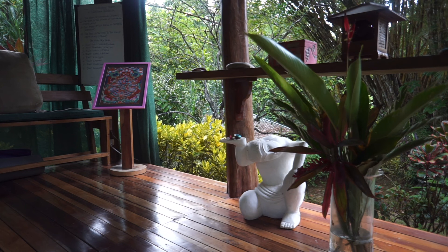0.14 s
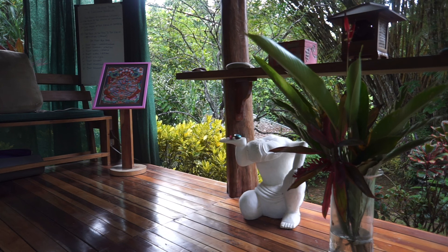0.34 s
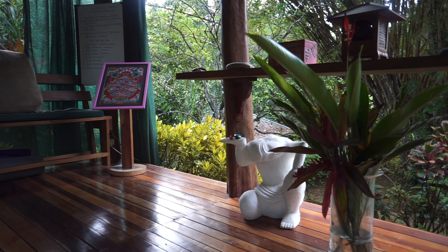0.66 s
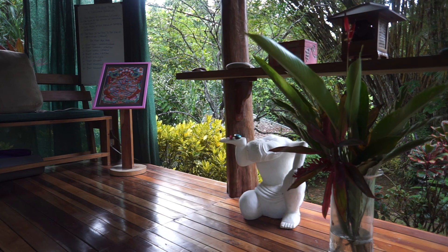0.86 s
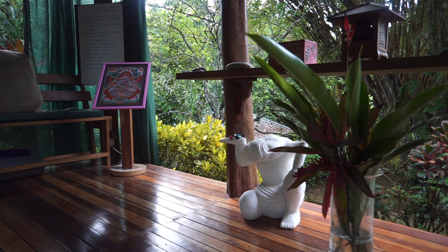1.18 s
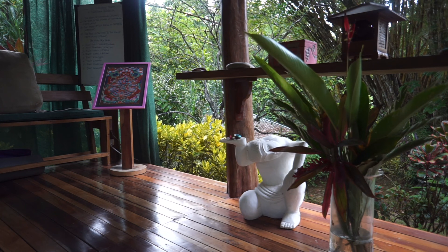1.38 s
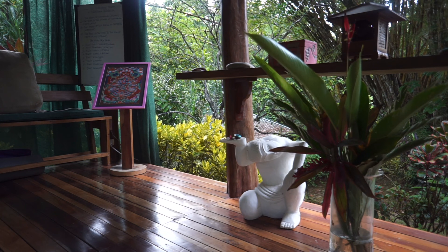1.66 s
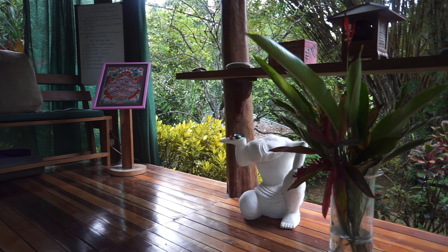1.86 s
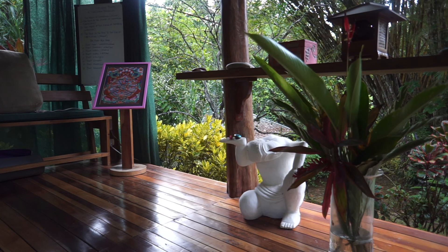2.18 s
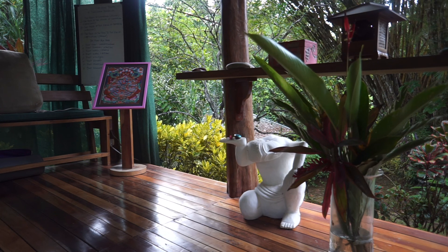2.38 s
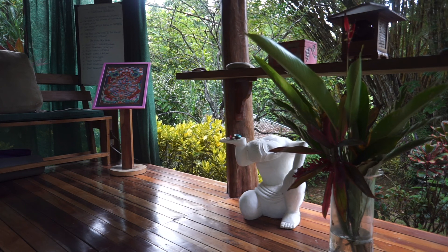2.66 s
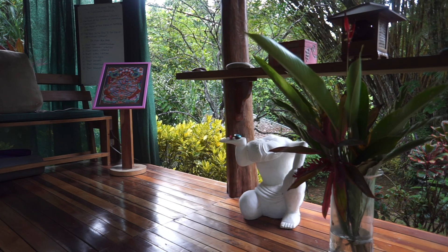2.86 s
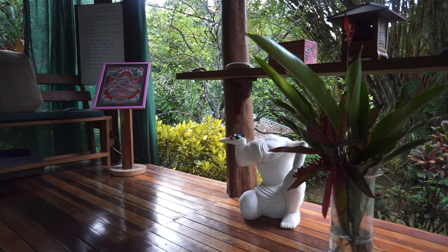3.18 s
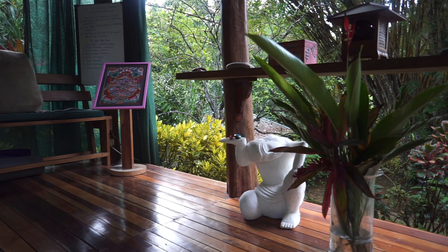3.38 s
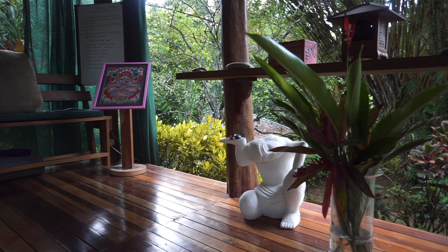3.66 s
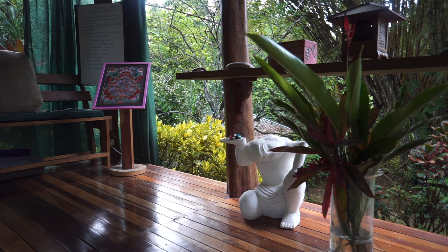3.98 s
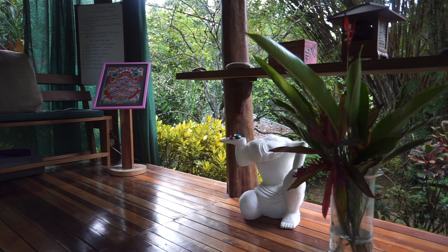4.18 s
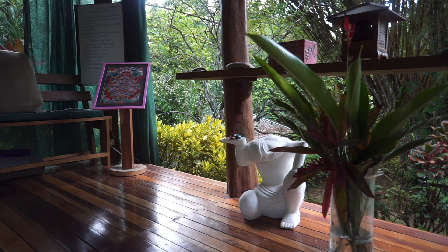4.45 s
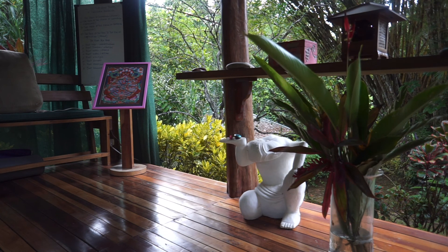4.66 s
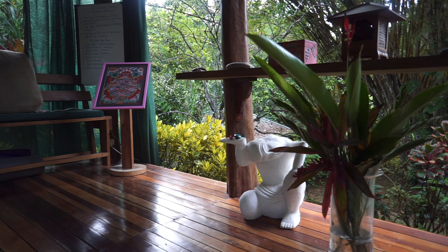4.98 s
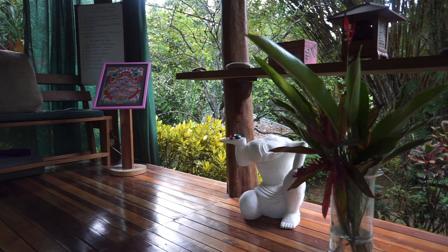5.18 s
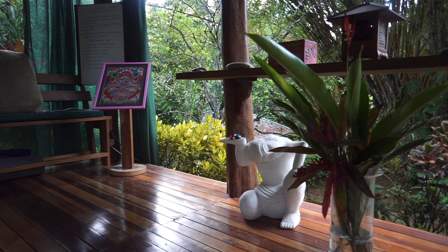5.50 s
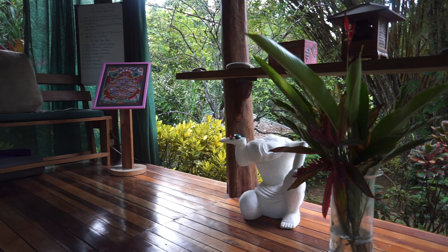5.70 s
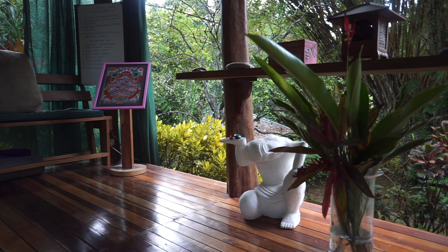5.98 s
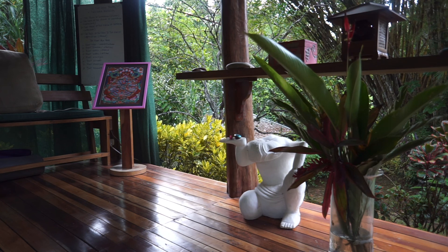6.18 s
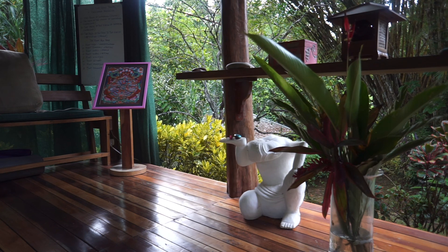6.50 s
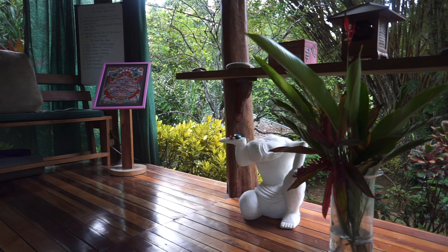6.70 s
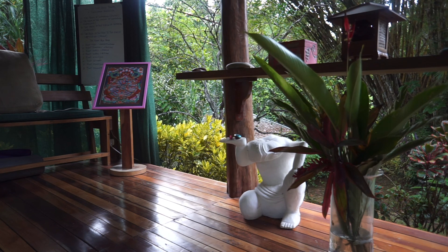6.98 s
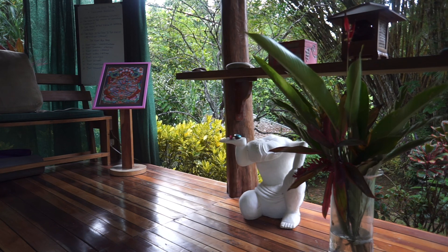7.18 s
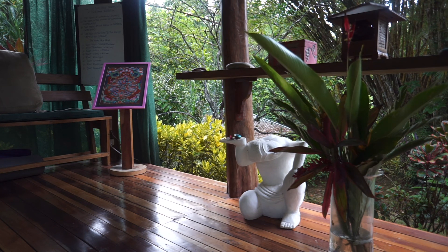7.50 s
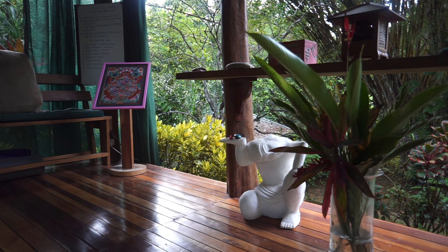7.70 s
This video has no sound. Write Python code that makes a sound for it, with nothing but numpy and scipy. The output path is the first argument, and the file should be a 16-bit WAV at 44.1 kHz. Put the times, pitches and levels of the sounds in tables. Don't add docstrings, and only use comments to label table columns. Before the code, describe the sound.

A quiet, wide stereo scene on a wooden veranda facing tropical forest. From 0 s a frog clicks about eight times a second until roughly 2.3 s, over soft leaf hiss, a far machine's low hum and four thin, throbbing insect tones between about 6 and 9 kHz, leaning left. Faint distant birds whistle; small twigs snap at 0.3, 0.6 and 0.9 s. Near 1.1 s a board gives a soft low thump. From 1.6 s a bird whistles pure notes gliding upward around 2 to 3 kHz, beaded with echoes among the trees. At 3.5 s the lingering echoes drop; a joint creaks around 3.8 s and leaves rasp at 4 s while rising pairs continue until 5.4 s. A long whistle leaps up at 5.7 s and sinks by 6.1 s amid rustling. Air puffs lightly on the microphone; sparse fainter calls return after 7 s, the last near 7.7 s.

```python
import sys
import numpy as np
from scipy import signal
from scipy.io import wavfile
from scipy.ndimage import uniform_filter1d

SR = 44100
rng = np.random.default_rng(int(sys.argv[2]) if len(sys.argv) > 2 else 0)


def pcm_store(signal):
    levels = np.round(np.clip(np.atleast_2d(signal), -1, 1) * 32767)
    wavfile.write(sys.argv[1], SR, levels.astype(np.int16).T)


def makeup_ratio(level_db):
    decades = np.asarray(level_db, float) / 20
    return 10 ** decades


N = 345734
LEFT_RIGHT = np.array([[.5], [-.5]])
FLASH_HZ = 2480


def rms_one(x):
    return x / np.sqrt(np.mean(x ** 2) + 1e-20)


def in_time(rows):
    s, *columns = np.transpose(rows)
    return [np.interp(np.arange(N) / SR, s, c) for c in columns]


def at_hz(points, hz):
    points = np.array(points)
    return np.interp(np.log(hz), np.log(points[:, 0] + 1), points[:, 1])


def drift(rate_hz):
    r = np.exp(-80 * np.pi * rate_hz / SR)
    slow = signal.lfilter([1], [1, -2 * r, r * r], rng.standard_normal(N // 40 + 2002))[2000:]
    return np.interp(np.arange(N) / 40, np.arange(len(slow)), rms_one(slow))


def noise_pair():
    return rng.standard_normal((2, N))


def band(x, low_hz, high_hz):
    sos = signal.butter(2, [low_hz, min(high_hz, .45 * SR)], "band", fs=SR, output="sos")
    return signal.sosfilt(sos, x)


def resonate(x, hz, width_hz):
    r = np.exp(-np.pi * width_hz / SR)
    return signal.lfilter([(1 - r * r) / 2, 0, (r * r - 1) / 2], [1, -2 * r * np.cos(2 * np.pi * hz / SR), r * r], x)


def strike(events, modes):
    clicks = np.zeros(N) + 1e-18
    clicks[[round(s * SR) for s, db in events]] = makeup_ratio(np.array(events)[:, 1])
    out = 0
    for k, (hz, db, t60) in enumerate(modes):
        r, w = makeup_ratio(-60 / (t60 * SR)), 2 * np.pi * hz / SR
        push = (-1) ** k * makeup_ratio(db) * np.sin(w)
        out = out + signal.lfilter([0, push], [1, -2 * r * np.cos(w), r * r], clicks)
    return out


def pair(mid, side, alike):
    alike = np.clip(alike, -1, 1)
    return (np.sqrt(1 + alike) * mid + np.sqrt(1 - alike) * side * [[1], [-1]]) / np.sqrt(2)


def whistle(note, waver, beads=0, throb=0):
    s, hz, db = np.transpose(note)
    s = s - 0.0037
    at = np.arange(round(s[0] * SR), min(round(s[-1] * SR), N))
    t = at / SR
    pitch = uniform_filter1d(np.interp(t, s, hz), size=500, mode="nearest") * (1 + waver[at])
    level = makeup_ratio(np.interp(t, s, db)) * np.clip(np.minimum((t - s[0]) / .022, (s[-1] - t) / .008), 0, 1)
    level = level * (1 + beads * np.cos(2 * np.pi * (pitch - FLASH_HZ) / 155))
    level = level * (1 + throb * np.cos(2 * np.pi * 42 * (t - 5.96)))
    out = np.zeros(N)
    out[at] = np.sqrt(2) * level * np.sin(2 * np.pi * np.cumsum(pitch) / SR)
    return out


# flash_s (when at the flash pitch), lead_in_s, climb_s, top_hz, knee_level_db
RISES = [(1.87, 0.019, 0.092, 2850, -61.5), (2.146, 0.079, 0.025, 2724, -47.5),
         (2.308, .085, 0.026, 2755, -45.5), (2.706, 0.1, .05, 3000, -46.5),
         (2.856, 0.065, 0.051, 2950, -46), (3.273, .065, 0.062, 3000, -46),
         (3.431, 0.038, 0.055, 3030, -45), (3.607, 0.084, .022, 2720, -45.5),
         (4.02, 0.082, 0.053, 2974, -45.5), (4.166, 0.041, .065, 2980, -44.5),
         (4.604, .065, 0.061, 2980, -44.5), (4.76, 0.029, .062, 3000, -43.5),
         (5.195, 0.076, 0.067, 2990, -44), (5.353, 0.018, 0.063, 3045, -43)]


def rising_notes(waver):
    out, knee_hz, top_hold_s = 0, 2400, .022
    for s, lead, climb, high, db in RISES:
        when = np.linspace(s - lead, s + climb + top_hold_s, num=40)
        hz = np.interp(when, [s - lead, s, s + .85 * climb, s + 1.18 * climb],
                       [FLASH_HZ - 5700 * lead, FLASH_HZ, high - .15 * (high - FLASH_HZ), high])
        khz = (hz - knee_hz) / 1000
        level = db + np.where(khz < 0, 29, 10.5) * khz
        level += 4 * np.exp(-((hz - FLASH_HZ) / 28) ** 2)
        level -= 14 * np.clip((when - s - 0.81 * climb) / top_hold_s, 0, 1)
        out = out + whistle(np.transpose([when, hz, level]), waver, beads=.65)
    return out


# start_s, length_s, from_hz, held_hz, peak_level_db
CLOSES = [
    (1.63, 0.079, 2103, 2468, -46.5),
    (2.95, 0.16, 1980, 2400, -45),
    (3.71, 0.069, 2030, 2250, -51),
    (4.29, 0.13, 2200, 2493, -42.5),
    (4.914, 0.054, 2390, 2290, -44.5),
    (5.5, 0.113, 2330, 2483, -43.5),
    (7.214, 0.11, 1955, 2385, -53.5),
    (7.73, 0.08, 2050, 2482, -45.5),
]


def closing_notes(waver):
    out = 0
    for s, length, low, held, db in CLOSES:
        note = [(s, low, db - 6), (s + .45 * length, held, db), (s + length, held, db - 7)]
        out = out + whistle(note, waver)
    return out


# start_s, pitch_hz, level_db
LONG_NOTE = [
    (5.71, 2313, -43),
    (5.79, 2669, -40),
    (5.88, 2658, -43),
    (6.0, 2594, -44.5),
    (6.07, 2538, -44),
]


def bird(waver):
    return rising_notes(waver) + closing_notes(waver) + whistle(LONG_NOTE, waver, throb=.3)


# start_s, length_s, from_hz, to_hz, level_db
FALLS = [(.25, .06, 2900, 3020, -54), (.15, .08, 2540, 2680, -54), (.34, .04, 3320, 3300, -56),
         (.94, .07, 2430, 2760, -52), (1.075, .03, 2450, 2480, -52), (1.55, .025, 2430, 2500, -52),
         (1.795, .05, 2110, 2090, -51), (7.4, .03, 2420, 2230, -49), (6.14, .09, 3860, 3800, -52),
         (6.104, .03, 3040, 3090, -37), (.57, .06, 3650, 3480, -51), (1.13, .05, 3800, 3800, -58),
         (1.27, .05, 3800, 3750, -57), (1.225, .07, 2320, 2297, -51), (1.322, .057, 2320, 2320, -46),
         (1.385, .097, 2830, 2730, -52), (6.085, .055, 2490, 2470, -36), (7.02, .035, 3840, 3835, -52),
         (7.33, .07, 2240, 2330, -49), (.01, .072, 2137, 2166, -51), (.69, .06, 2190, 2150, -57)]
# start_s, pitch_hz, level_db
WARBLE = [
    (7.54, 1790, -57),
    (7.585, 2110, -67),
    (7.64, 2100, -62),
    (7.67, 2020, -58),
    (7.7, 1930, -63),
    (7.75, 1890, -62),
]


def farther_birds(waver):
    out = whistle(WARBLE, waver)
    for s, length, start_hz, end_hz, db in FALLS:
        out += whistle([(s, start_hz, db), (s + length, end_hz, db - 14.5)], waver)
    return out


# start_s, peak_db
FROG = [(0.0094, -53), (0.1206, -51), (0.2394, -52), (0.3541, -50), (0.4753, -48), (0.5901, -48.5),
        (0.7058, -48.5), (0.823, -49), (0.9494, -55), (1.072, -53), (1.1942, -47), (1.3179, -52),
        (1.4311, -64), (1.5514, -52), (1.6906, -51), (1.7933, -49), (1.9116, -48), (2.0457, -57),
        (2.164, -52), (2.2777, -52)]
# pitch_hz, level_db, t60_s
FROG_MODES = [(1129, 3.5, 0.042), (1330, 4, 0.018), (2070, -1.5, 0.073), (2165, -1.5, 0.19)]


def frog():
    return strike(FROG, FROG_MODES)


# pitch_hz, width_hz
VERANDA_HZ = [(2010, 40), (2130, 30), (2250, 34), (2345, 28), (2410, 20), (2478, 20), (2548, 20),
              (2650, 32), (2745, 28), (2810, 22), (2855, 18), (2930, 36), (3030, 36)]
# left_db, right_db
VERANDA = [(3, 7), (4, 10.5), (-18, 5), (-1.5, -5.5), (5, 5.5), (9, 7), (3.5, 9), (4.5, 6), (3, -33),
           (4, -14), (-11, 9), (-9, -1), (0, 11)]


def forest(x, wet_db):
    t = np.arange(3 * SR // 2) / SR
    decay = makeup_ratio(-60 * t / 1.1) + makeup_ratio(-1 - 60 * t / .62)
    scatter = pair(*rng.standard_normal((2, len(t))), .6) * decay * np.minimum(t / .006, 1)
    response = makeup_ratio(wet_db) * scatter / np.sqrt(np.sum(scatter ** 2) / 2)
    click = (t == 0) + 1e-18
    response += makeup_ratio(-3.5) * click
    for k, ((hz, width), sides_db) in enumerate(zip(VERANDA_HZ, VERANDA)):
        response += (-1) ** k * makeup_ratio(np.array(sides_db)[:, None]) * resonate(click, hz, width)
    before = np.arange(N) < 3.523 * SR
    early = signal.fftconvolve([x * before], response, axes=1)[:, :N]
    late = signal.fftconvolve([x * ~before], response, axes=1)[:, :N]
    return early * np.where(before, 1, makeup_ratio(-6.5)) + late


# start_s, level_db
INSECT_HIGH = [(0.0, -61), (0.94, -59.5), (1.55, -67.5), (1.79, -60.5), (2.4, -65.5), (2.9, -59.5),
               (3.49, -69), (3.54, -62.5), (5.02, -57), (5.42, -63), (6.09, -54.5), (6.57, -60),
               (7.77, -58), (7.84, -60.5)]
# start_s, end_s, level_db
BOUTS = [
    (0.547, 1.94, -62.5),
    (2.72, 5.018, -61.5),
    (5.5, 6.8, -60.5),
    (7.13, 8.14, -60),
]
# start_s, level_db
INSECT_BROAD = [
    (0, -60.5),
    (.5, -65.5),
    (2.1, -62.5),
    (3, -61.5),
    (7.84, -61),
]
# middle_s, level_db
INSECT_CHIRP = [(.27, -60), (.97, -62), (1.4, -62), (1.85, -59), (2.3, -61), (2.83, -61), (3.37, -70),
                (3.72, -67), (4.22, -60), (4.7, -61), (5.17, -63), (5.7, -58), (6.1, -61), (6.55, -64),
                (6.97, -61), (7.45, -59)]
# pitch_hz, width_hz
INSECT_HZ = [
    (8598, 75),
    (6853, 45),
    (6575, 120),
    (6095, 90),
]
# throbs_per_s, throb_depth (0-1), left_right_db, left_right_likeness (0-1), trim_db
VOICES = [
    (65, .4, 1.5, .5, 1.5),
    (37, .4, 5, .5, 2),
    (37, .3, 2.5, .3, 1.5),
    (40, .3, 7, .4, 5),
]


def insects():
    chirps = []
    for s, db in INSECT_CHIRP:
        chirps += [(s + side * .12, db - 14 * abs(side) ** 3) for side in (-1.24, -0.86, 0.9, 1)]
    bouts, edge_s, rest_db = [], .09, -67.5
    for a, b, db in BOUTS:
        bouts += [(a - edge_s, rest_db), (a + edge_s, db), (b - edge_s, db), (b + edge_s, rest_db)]
    levels = [in_time(rows)[0] for rows in (INSECT_HIGH, bouts, INSECT_BROAD, chirps)]
    levels[0] = levels[0] + 0.43 * drift(9.0)
    out = 0
    for level_db, (hz, width), (rate, depth, pan_db, alike, trim_db) in zip(levels, INSECT_HZ, VOICES):
        song = resonate(resonate(noise_pair(), hz, width), hz, 4 * width)
        throb = 1 + depth * np.sin(2 * np.pi * np.cumsum(rate * (1 + 0.0455 * drift(2.82))) / SR)
        song = rms_one(pair(*song, alike) * throb * makeup_ratio(drift(12)))
        out = out + song * makeup_ratio(level_db + trim_db) * makeup_ratio(pan_db * LEFT_RIGHT)
    return out


# start_s, level_db
THUMP = [
    (1.056, -35.5),
    (1.074, -40.5),
    (1.098, -34.5),
]
# pitch_hz, level_db, t60_s
BOARD = [(175.9, 10.5, 0.59), (205, 4.5, 0.5), (227, -4, 0.43), (249, 6, 0.22), (264.6, 1.5, 0.35),
         (296.6, -2, 0.49), (350, -9, 1), (386, -18.5, 0.62), (450, -17, 0.32), (534, -17, .3),
         (610, -31, .2), (663, -11.5, 0.057), (750, -21, 0.091)]


def thump():
    return band(band(strike(THUMP, BOARD), 183, 1200), 110, 3000)


# start_s, slips_per_s, level_db
CREAK = [
    (3.795, 220, -51),
    (3.82, 190, -46),
    (3.84, 230, -53),
    (3.858, 246, -44),
    (3.872, 240, -51),
    (3.89, 207, -42),
    (3.925, 240, -57),
]
# pitch_hz, width_hz, level_db
CREAK_MODES = [(229, 49, 6), (426, 73, 2), (593, 123, 5)]


def creak():
    rate, level_db = in_time(CREAK)
    turns = np.cumsum(rate * (1 + .16 * drift(90))) / SR
    slips = np.diff(np.floor(turns), prepend=0) * makeup_ratio(1.5 * drift(40))
    wood = sum(makeup_ratio(db) * resonate(resonate(slips, hz, width), hz, 2 * width) for hz, width, db in CREAK_MODES)
    t = np.arange(N) / SR
    return rms_one(wood) * makeup_ratio(level_db) * (t > CREAK[0][0]) * (t < CREAK[-1][0])


# start_s, level_db, low_hz, high_hz
SNAPS = [
    (0.294, -49.5, 3500, 10500),
    (.565, -44.5, 1710, 4450),
    (0.916, -47, 2000, 2920),
    (1.057, -47.5, 500, 1400),
    (2.914, -52, 7100, 10700),
    (3.555, -55, 4000, 10500),
    (4.655, -46, 350, 990),
    (4.71, -52, 7000, 11300),
    (5.249, -47, 566, 1460),
]
# start_s, level_db,
# low_hz, high_hz
BRUSHES = [(.585, -56, 3080, 3750), (0.936, -60, 2300, 2920), (1.065, -44.5, 290, 623),
           (1.292, -52.5, 2500, 5500), (2.62, -54.5, 2940, 3700), (2.869, -48.5, 1140, 2070),
           (4.004, -51.5, 910, 1120), (4.008, -51, 1500, 2050), (4.141, -48.5, 1520, 2130),
           (4.429, -54, 1260, 1710), (4.428, -53.5, 3040, 4630), (5.62, -49.5, 830, 1970),
           (6.1, -40.5, 2640, 3100), (6.105, -48, 3020, 3950), (6.17, -49, 2260, 3060),
           (6.225, -50.5, 862, 1590), (7.119, -51.5, 2180, 3200), (7.13, -51, 890, 10500),
           (7.41, -51.5, 1190, 4470)]
# start_s, level_db
RASPS = [
    (4.016, -46.5),
    (6.051, -47),
]
# low_hz, high_hz, level_db
RASP_BANDS = [(1460, 2320, -3.5), (2980, 3120, -2.5), (3200, 3840, 1.5), (3660, 3900, -3),
              (3650, 5640, -1.5)]


def rustles():
    # start, level, band edges, rise s, t60 s, depth of pulsing
    bursts = [(*row, .0013, .27, 0) for row in SNAPS]
    bursts += [(*row, .0088, .53, 0) for row in BRUSHES]
    bursts += [(s, db + 4.5, low, high, .0013, .018, 0) for s, db, low, high in SNAPS]
    for s, db in RASPS:
        bursts += [(s, db + band_db, low, high, .045, .63, .8) for low, high, band_db in RASP_BANDS]
    out, t = np.zeros((2, N)), np.arange(SR // 2) / SR
    for s, db, low, high, rise, t60, pulsing in bursts:
        noise = rng.standard_normal((2, len(t)))
        lumps_db = 0.94 * rng.standard_normal(len(t) // 50 + 1).repeat(50)[:len(t)]
        pulses = 1 + pulsing * np.sin(2 * np.pi * 230 * t + 3 * np.sin(70 * t))
        grains = noise * makeup_ratio(lumps_db) * pulses
        shape = np.minimum(t / rise, 1) * makeup_ratio(-60 * np.maximum(t - rise, 0) / t60)
        burst = makeup_ratio(db) * rms_one(band(band(pair(*grains, 0.26), low, high), low, high)) * shape
        at = round(s * SR)
        out[:, at:at + len(t)] += burst[:, :N - at]
    return out


# start_s, peak_db
PUFFS = [(1.14, -50), (1.42, -65), (3.6, -68), (5.15, -66), (5.83, -63), (6.131, -55), (6.33, -55),
         (6.62, -60), (7.23, -58), (7.53, -51.5), (7.82, -57)]


def air():
    t = np.arange(N) / SR
    level = makeup_ratio(-69) + sum(makeup_ratio(db - 139 * abs(t - s)) for s, db in PUFFS)
    return level * makeup_ratio(0.61 * drift(5.0)) * rms_one(band(pair(*noise_pair(), 0.87), 40, 111))


# start_s, level_db
BREEZE = [(0, -55), (1.3, -56), (1.9, -54), (2.45, -56.5), (3.3, -52), (4.8, -53), (5.5, -53),
          (6.15, -48.5), (6.6, -55), (7.0, -55), (7.25, -51.5), (7.84, -54.5)]


def breeze():
    level = makeup_ratio(in_time(BREEZE)[0] + 1.5 * drift(0.41))
    return level * rms_one(band(pair(*noise_pair(), 0.015), 590, 3530))


# start_s, level_db
CHORUS = [(0, -54.5), (.4, -57), (.8, -53), (1.2, -55.5), (1.6, -57), (2.0, -56), (2.6, -60), (3.2, -59),
          (6.3, -54), (6.6, -82), (7.1, -77), (7.84, -62)]


def chorus():
    bands = (makeup_ratio(5.1 * drift(6.2)) * resonate(noise_pair(), hz, 200) for hz in np.geomspace(2050, 3300, 5))
    return makeup_ratio(in_time(CHORUS)[0]) * rms_one(pair(*sum(bands), 1.0))


# pitch_hz, level_db, width_hz
HUM = [(117.4, -62.5, 23), (359, -63, 1.44)]


def hum():
    return sum(makeup_ratio(db) * rms_one(resonate(rng.standard_normal(N), hz, width)) for hz, db, width in HUM)


# pitch_hz, level_db (per Hz)
BED = [(30, -35), (60, -15.5), (118, -2.5), (288, 0), (450, -2), (800, -10), (2230, -13), (3600, -25),
       (5400, -10.5), (6500, -16), (7600, -19), (9500, -18), (10500, -22.5)]
# pitch_hz, left_right_likeness
LIKENESS = [(60, 0.87), (130, 0.82), (260, 0.34), (550, 0.014), (1150, 0.015), (2410, 0.13), (5050, 0.26),
            (10600, 0.15)]
# pitch_hz, left_right_db
SIDES_DB = [(60, -8), (170, 1), (470, 0), (1340, -0.5), (3760, 2.5), (10600, 1)]


def bed(patchy_db):
    out, edges = 0, 30 * 2 ** np.arange(0, 9.1, .5)
    white = rng.standard_normal((2, 2, N))
    for k, (low, high) in enumerate(zip(edges, edges[1:])):
        hz = np.sqrt(low * high)
        gain = makeup_ratio(at_hz(BED, hz) + patchy_db * drift(19.0) + at_hz(SIDES_DB, hz) * LEFT_RIGHT)
        out = out + gain * pair(*band(white[k % 2], low, high), at_hz(LIKENESS, hz))
    return rms_one(out)


def scene():
    waver, ticks = drift(37.6), frog()
    birds = bird(.0015 * waver) + farther_birds(.011 * waver)
    far = forest(birds + makeup_ratio(-9.0) * ticks, wet_db=5) * makeup_ratio(.9 * drift(11))
    near = makeup_ratio(-3.5) * ticks + thump() + creak()
    weather = breeze() + hum() + air()
    hiss = makeup_ratio(-50.5 + 0.47 * drift(5.0)) * bed(patchy_db=1.0)
    return far + near + weather + hiss + insects() + rustles() + chorus()


def low_pass(x):
    return signal.sosfilt(signal.butter(12, 11075, fs=SR, output="sos"), x)


def record(dry):
    mix = np.array([np.roll(dry[0], 4), dry[1]])
    return low_pass(mix)


dry = scene()
out = record(dry)
pcm_store(out)
```